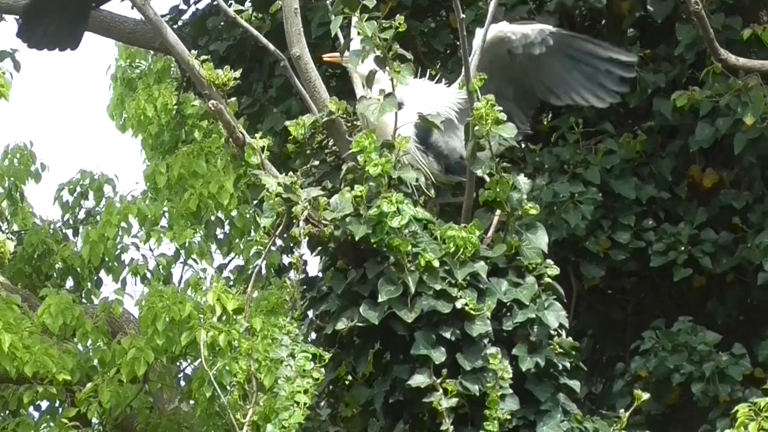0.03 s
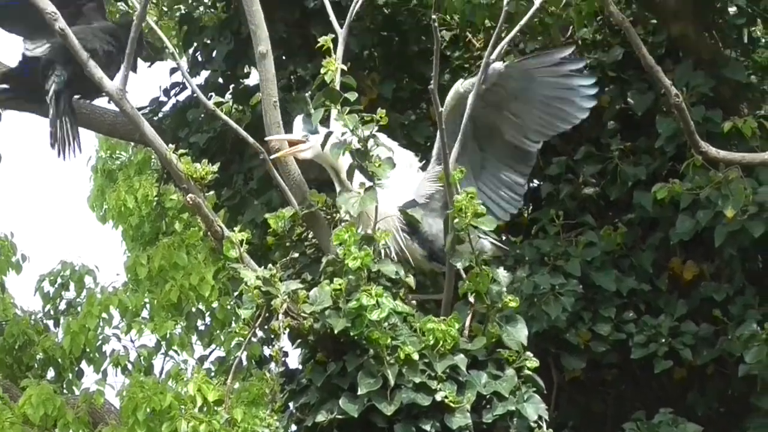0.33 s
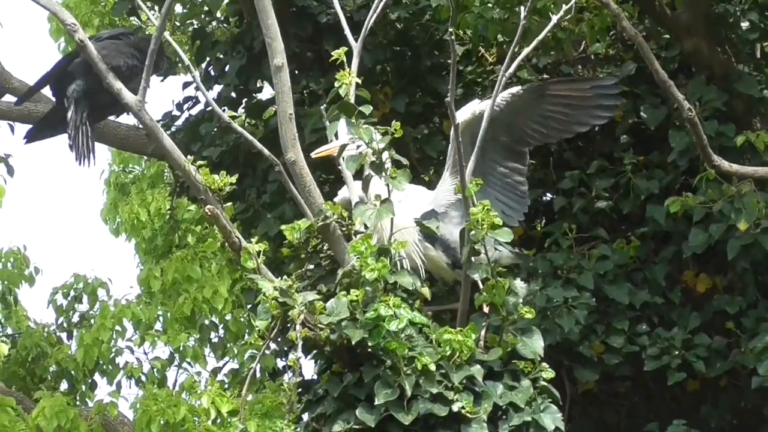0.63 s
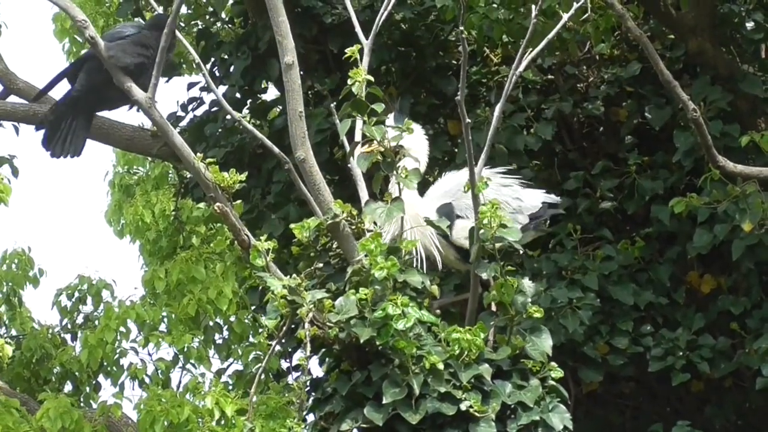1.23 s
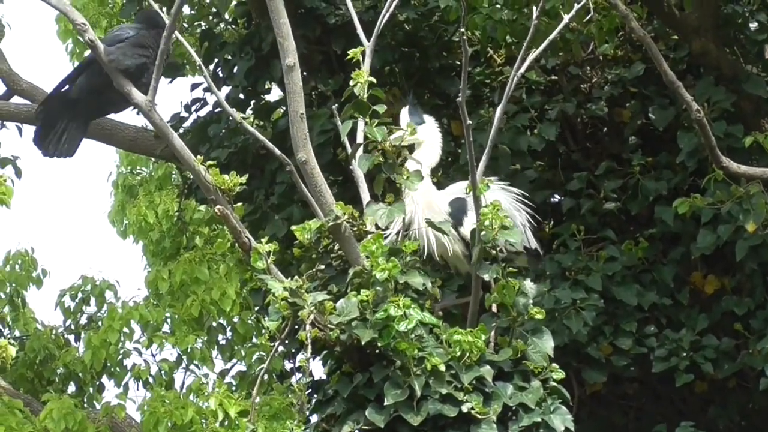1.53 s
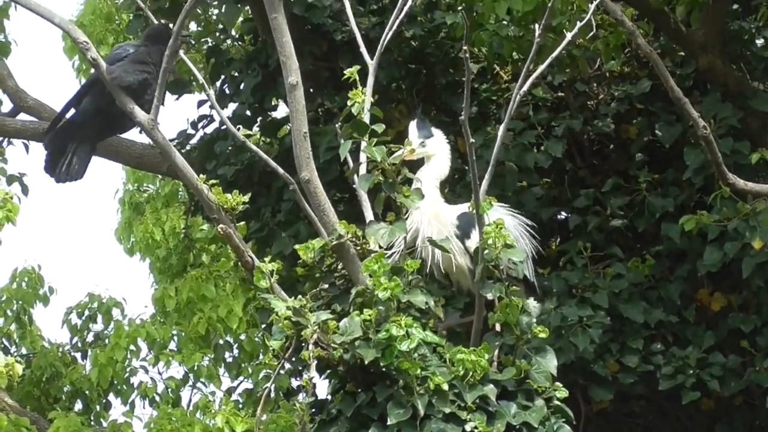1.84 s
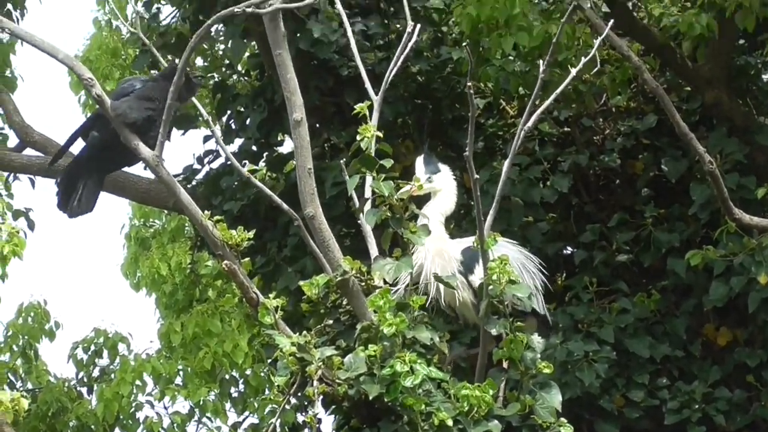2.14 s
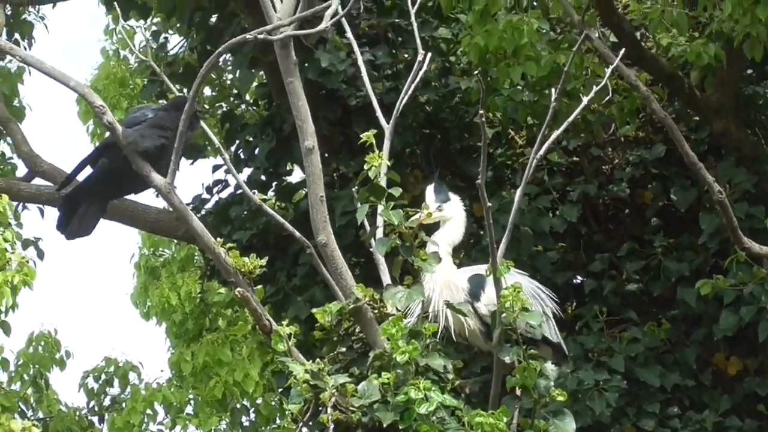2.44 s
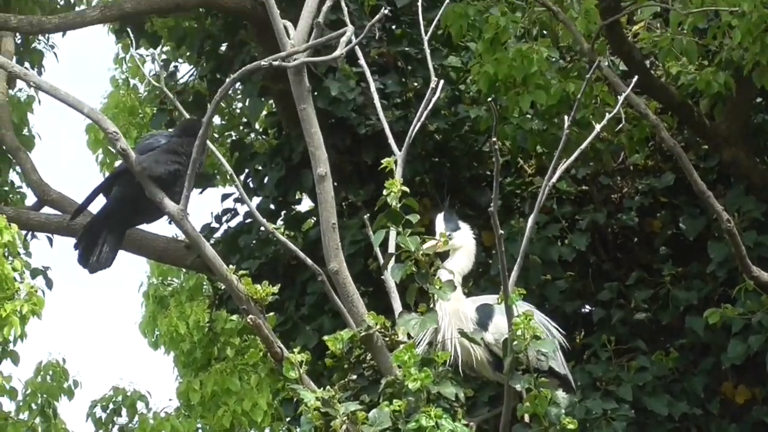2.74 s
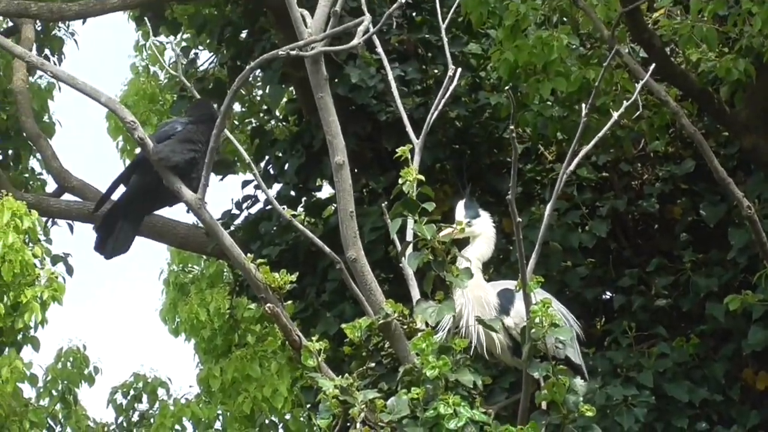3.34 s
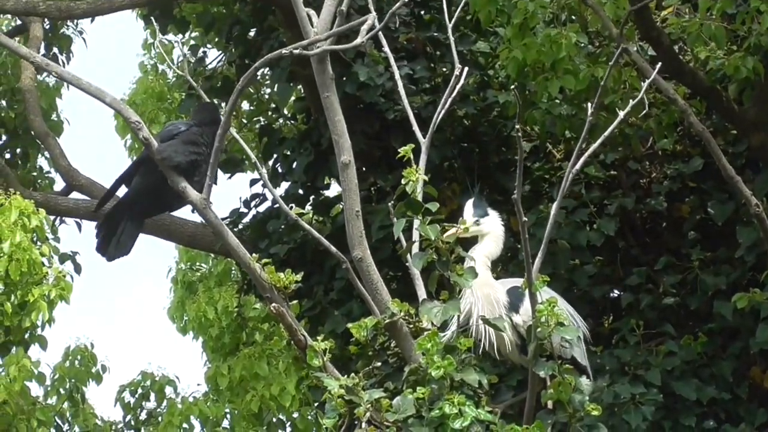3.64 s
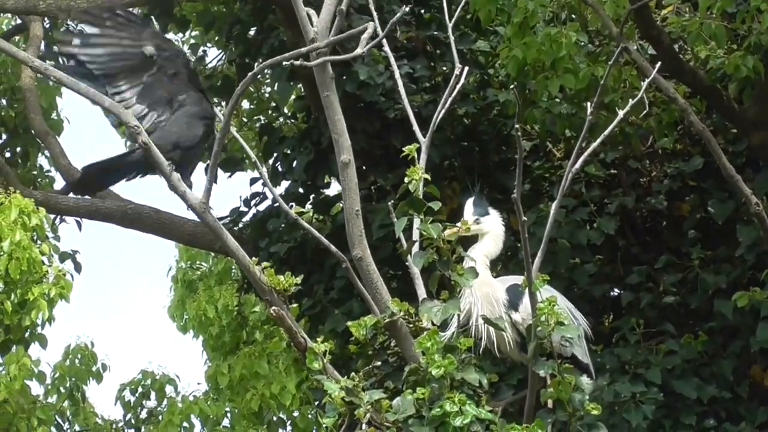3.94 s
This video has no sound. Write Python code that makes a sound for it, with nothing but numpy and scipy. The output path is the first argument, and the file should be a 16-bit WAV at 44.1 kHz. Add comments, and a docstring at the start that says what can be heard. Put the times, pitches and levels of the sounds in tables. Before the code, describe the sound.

A large bird croaks harshly again and again in the trees, a helicopter throbbing far off.

```python
"""A row of hoarse croaks, one sharp squawk and a grunt ring among the trees: a heron fends off a crow
at its treetop nest. The croaks and the grunt are a loose rattle that makes the bird's throat ring.
Wings brush the leaves, a twig cracks, a small bird whistles far off and something chirps faintly.
Under it all throb the blades of a distant rotor, probably a helicopter, slowly coming nearer."""
import sys
import numpy as np
from scipy import signal
from scipy.fft import rfft, irfft
from scipy.io import wavfile
from scipy.ndimage import uniform_filter1d

SR = 44100
rng = np.random.default_rng(int(sys.argv[2]) if len(sys.argv) > 2 else 0)


def master(y):
    """Save y as 16-bit WAV."""
    cut = np.clip(np.atleast_2d(y).T, -1, 1)
    pcm = np.round(cut * 32767)  # scale
    wavfile.write(sys.argv[1], SR, pcm.astype(np.int16))


N = 176400
T = np.arange(N) / SR


def from_db(db):
    """Turn decibels into a number to multiply by."""
    return 10 ** (np.asarray(db) / 20)


def unit_power(x):
    """Scale a sound so that its average power is 1."""
    return x / np.sqrt(np.mean(x ** 2) + 1e-20)


def steady(x, window_s):
    """Even out the loudness over a short window."""
    return x / np.sqrt(np.abs(uniform_filter1d(x * x, int(window_s * SR))) + 1e-6)


def over_time(rows):
    """Join a table's points with straight lines: one curve for each column after the time."""
    times, *columns = np.transpose(rows)
    return [np.interp(T, times, column) for column in columns]


def at_hz(points, hz):
    """Look up a frequency in a table, with octaves evenly spaced."""
    freqs, values = np.transpose(points)
    return np.interp(np.log(np.maximum(hz, 1)), np.log(freqs), values)


def drift(hz):
    """A smooth random wobble of about +-1; more hz makes it quicker."""
    r = np.exp(-200 * np.pi * hz / SR)
    slow = signal.lfilter([1], [1, -2 * r, r * r], rng.standard_normal(N // 100 + 1002))[1000:]
    return np.interp(np.arange(N) / 100, np.arange(len(slow)), unit_power(slow))


def colour(x, spectrum):
    """Give a sound the bass-to-treble balance in a table, at power 1."""
    cepstrum = irfft(at_hz(spectrum, np.fft.rfftfreq(N, 1 / SR)) * np.log(10) / 20)
    response = np.exp(rfft(2 * cepstrum * (np.arange(N) < N // 2)))  # rings after a click, not before
    return unit_power(irfft(rfft(x) * response))


def resonate(x, hz, width_hz):
    """Make a sound ring around one frequency, at power 1."""
    r = np.exp(-np.pi * width_hz / SR)
    section = [1 - r, 0, r - 1, 1, -2 * r * np.cos(2 * np.pi * hz / SR), r * r]
    return unit_power(signal.sosfilt([section, section], x))


def envelope(start, length, attack, release):
    """Rise, hold, then die away; all times in seconds."""
    return np.clip((T - start) / attack, 0, 1) * np.exp(-np.clip((T - start - length) / release, 0, 20))


def pan(x, db):
    """Make the left side louder than the right by db."""
    return x * from_db([[db / 2], [-db / 2]])


def rattle(hz, jitter, decay_s, uneven_db, snap):
    """Uneven slaps, as of a loose skin: each is a click and a dying puff of air."""
    draws = rng.standard_normal((int(2 * hz * N / SR), 2))
    at = (np.cumsum(np.exp(jitter * draws[:, 0])) * SR / hz).astype(int)
    clicks = np.zeros(N)
    clicks[at[at < N]] = from_db(uneven_db * np.clip(draws[at < N, 1], -2, 2))
    puffs = signal.lfilter([1], [1, -np.exp(-1 / (decay_s * SR))], clicks) * rng.standard_normal(N)
    return unit_power(unit_power(puffs) + snap * unit_power(clicks))


# how alike the two ears hear the background: (frequency [Hz], likeness [0-1])
EAR_LIKENESS = [(30, 0.9), (60, 0.98), (250, 0.94), (600, 0.62), (1500, 0.48), (5000, 0.16), (13000, 0)]
def wide_noise(spectrum):
    """Stereo noise, alike on both sides in the bass and different in the treble."""
    alike = np.clip(at_hz(EAR_LIKENESS, np.fft.rfftfreq(N, 1 / SR)), 0, .999)
    mid, side = rfft(rng.standard_normal((2, N)))
    return colour(irfft(np.sqrt(1 + alike) * mid + np.sqrt(1 - alike) * side * [[1], [-1]]), spectrum)


# tone of the still air: (frequency [Hz], relative level [dB])
AIR_COLOUR = [(25, 19), (60, 27), (300, 21.5), (1000, 16), (2200, 0), (4200, 8.5), (6200, -3.5), (9500, 1),
              (12000, -1), (14000, -25.5), (15500, -66)]
def air():
    """A soft, steady outdoor hush."""
    return from_db(-50.5) * wide_noise(AIR_COLOUR)


# tone of the rushing air: (frequency [Hz], relative level [dB])
WASH_COLOUR = [(40, -27), (110, -9), (170, -1.5), (330, 1.5), (480, -8), (700, -11), (1100, -16.5),
               (1500, -28), (2200, -36.5), (5000, -49.5)]
# its slow rise: (time [s], level [dB])
WASH_RISE = [(0, -35.5), (1.5, -33), (2.3, -32), (3.2, -31), (4, -31)]
def rotor_wash(phase):
    """Air pushed by the blades rushes, pulsing very slightly with each one."""
    level_db = over_time(WASH_RISE)[0] + 0.14 * np.cos(phase) + 0.35 * drift(2.7)
    return wide_noise(WASH_COLOUR) * from_db(level_db)


# loudness of the hum: (time [s], level [dB])
HUM_LEVEL = [(0, -44), (.55, -41), (1.55, -39), (1.75, -54), (2.05, -47), (2.55, -44), (2.9, -40),
             (3.4, -44), (3.6, -50.5), (4, -49)]
def rotor_hum(phase):
    """A low, wavering hum at twice the rate of the blades."""
    tone = np.sqrt(2) * np.sin(2 * phase + 0.15 * drift(1.8))
    return tone * from_db(over_time(HUM_LEVEL)[0] + 2.2 * drift(2.3))


# the tones that make up a slap: (multiple of the blade rate, relative level [dB])
SLAP_TONES = [(3, -22), (4, -6), (5, 1), (6, -1.5), (7, -2.5), (8, -4), (9, -4), (10, -7), (11, -8),
              (12, -20), (13, -41), (14, -29), (15, -16.5), (16, -25.5), (17, -20), (18, -21.5), (19, -42)]
# brightness of the slaps, above 0 favouring high tones: (time [s], tilt [dB per octave])
SLAP_TILT = [(0, -4.5), (1, 2), (2, 1), (2.4, -4.5), (3, 2.5), (4, -2.5)]
# slaps that arrive directly: (time [s], level [dB])
SLAP_LEVEL = [(0, -32), (.45, -46), (.8, -30), (1.1, -35.5), (1.22, -38.5), (1.5, -30.5), (1.85, -39),
              (2.08, -39), (2.28, -25.5), (2.46, -35.5), (2.62, -30.5), (2.76, -43), (2.94, -36),
              (3.13, -27), (3.3, -37), (3.5, -28), (3.75, -34.5), (3.93, -23.5), (4, -29)]
# slaps scattered by the surroundings: (time [s], level [dB])
ECHO_LEVEL = [(0, -33.5), (.7, -35.5), (1.5, -30.5), (2.05, -34), (2.6, -30.5), (3.1, -32), (4, -26.5)]
def blade_slaps(phase):
    """The blades slap the air in a throb that swells and fades, blurred by wandering echoes."""
    tilt, = over_time(SLAP_TILT)
    wander_hz = 1.5
    slaps, echoes, side = 0, 0, 0
    for k, db in SLAP_TONES:
        lag = 0.064 * (round(k) - 7) ** 2  # draws each slap out
        tone = from_db(db + tilt * np.log2(k / 7)) * np.exp(1j * (round(k) * phase - lag))
        slaps = slaps + tone.real * (1 + .25 * drift(wander_hz))
        echoes = echoes + tone.real * drift(wander_hz) + tone.imag * drift(wander_hz)
        side = side + tone.imag * drift(wander_hz)
    throb = unit_power(slaps) * from_db(over_time(SLAP_LEVEL)[0])
    blur = steady(echoes, window_s=0.35) + from_db(-17.5) * unit_power(side) * [[1], [-1]]
    return throb + blur * from_db(over_time(ECHO_LEVEL)[0])


# how often a blade passes: (time [s], rate [Hz])
BLADE_PASSES = [(0, 37.25), (1.7, 37.25), (1.9, 36.8), (2.4, 36.8), (2.75, 36.45), (3.15, 36.7), (4, 36.7)]
def rotor():
    """The distant turning blades set one beat for the slaps, the hum and the wash."""
    rate, = over_time(BLADE_PASSES)
    delay_s = .022
    phase = 2 * np.pi * (np.cumsum(rate) / SR - delay_s * rate)
    return pan(blade_slaps(phase) + rotor_hum(phase), db=-2.2) + pan(rotor_wash(phase), db=2.0)


# how long the trees ring: (frequency [Hz], time to fade by 60 dB [s])
ECHO_FADE = [(500, 0.6), (1300, 1.0), (4000, 1.2), (8000, .55), (15000, .5)]
# how strongly they ring: (frequency [Hz], level [dB])
ECHO_COLOUR = [(500, 4), (1300, -4.5), (4000, -2.5), (8000, -6.5), (15000, -7)]
# how wide the ring sounds: (frequency [Hz], width [side over middle])
ECHO_WIDTH = [(1300, 0.49), (4000, 0.56), (10000, 1.4)]
def tree_echo(x):
    """Trunks and leaves scatter a sound into a soft tail that dies soonest in the high treble."""
    edges = np.geomspace(300, 17000, num=10)
    tail = 0
    for low, high in zip(edges, edges[1:]):
        band = signal.butter(2, [low, high], "band", fs=SR, output="sos")
        mid, side = signal.sosfilt(band, rng.standard_normal((2, SR)))
        hz = np.sqrt(low * high)
        decay = unit_power(from_db(-60 * T[:SR] / at_hz(ECHO_FADE, hz))) / np.sqrt(SR)
        stereo = mid + at_hz(ECHO_WIDTH, hz) * side * [[1], [-1]]
        tail = tail + from_db(at_hz(ECHO_COLOUR, hz)) * decay * stereo
    return signal.fftconvolve(x[None], tail, axes=1)[:, :N]


# faint chirping that grows near the end: (time [s], level [dB])
CHIRP_LEVEL = [(3.2, -95), (3.29, -80), (3.45, -85), (3.52, -76), (4, -72)]
def chirping():
    """A thin, fitful, very high trill, perhaps an insect."""
    pulse_hz = 22
    pulses = from_db(6 * np.sin(2 * np.pi * pulse_hz * T + 2 * drift(6)) + 3.5 * drift(12))
    whine = resonate(rng.standard_normal(N), hz=13250, width_hz=300)
    return from_db(over_time(CHIRP_LEVEL)[0]) * unit_power(whine * pulses)


# the small bird's notes: (start [s], length [s], pitch [Hz], level [dB])
SONG_NOTES = [(0.636, .2, 3980, -52.5), (.86, 0.11, 5280, -60), (1.18, .13, 5290, -59.5),
              (1.45, 0.14, 5850, -60), (1.846, 0.086, 5600, -55.5), (2.12, 0.1, 5200, -62)]
def songbird():
    """A small bird sings thin, wavering whistles."""
    waver = 1 + .03 * drift(130.7)
    song = 0
    for start, length, hz, db in SONG_NOTES:
        whistle = np.sin(2 * np.pi * np.cumsum(hz * waver) / SR)
        song = song + from_db(db) * envelope(start, length, attack=0.0049, release=0.036) * whistle
    return song


# wings touching the leaves: (start [s], length [s], level [dB])
WING_STROKES = [(0.58, 0.027, -50.5), (0.973, 0.074, -48.5), (1.813, 0.071, -47), (2.082, 0.096, -53),
                (2.62, 0.028, -56), (2.762, 0.021, -52), (2.893, 0.12, -54), (3.547, 0.018, -50.5),
                (3.672, 0.013, -51.5), (3.804, 0.016, -51)]
# tone of the rustle: (frequency [Hz], relative level [dB])
LEAF_COLOUR = [(500, -5), (1050, 22.5), (1500, 0), (2100, 9.5), (3000, 4), (4200, 6), (6200, -0.5),
               (9000, 2), (12000, -16), (15500, -43)]
def wing_brushes():
    """Feathers drag over leaves in short, grainy swishes."""
    grains = rattle(hz=900, jitter=.6, decay_s=.002, uneven_db=2.5, snap=.25)
    rustle = steady(colour(grains, LEAF_COLOUR), window_s=.02)
    return rustle * sum(from_db(db) * envelope(start, length, attack=0.011, release=0.014)
                        for start, length, db in WING_STROKES)


# the wood giving way: (time [s], level [dB])
TWIG_SNAPS = [(2.855, -48), (3.602, -35.5), (3.611, -47)]
# tone of a snap: (frequency [Hz], relative level [dB])
TWIG_COLOUR = [(600, 7), (1500, 10.5), (2500, -1), (4000, -3), (6200, -8.5), (9000, -1), (12000, -10),
               (15500, -22)]
def twig_cracks():
    """A twig cracks in sudden bursts of noise that die quickly."""
    bursts = sum(from_db(db) * envelope(start, 0.0025, attack=0.0015, release=0.012)
                 for start, db in TWIG_SNAPS)
    return bursts * colour(rng.standard_normal(N), TWIG_COLOUR)


# where the throat rings in the grunt: (frequency [Hz], width [Hz], relative level [dB])
GRUNT_RINGS = [(1070, 120, 1), (2065, 290, -10), (2250, 390, -11), (4040, 1900, -6.5), (7400, 2900, -9),
               (9400, 5300, -17)]
def grunt():
    """One short nasal grunt: a quick rattle through a narrowed throat."""
    source = rattle(hz=165, jitter=.07, decay_s=.0025, uneven_db=1.5, snap=.8)
    voice = sum(from_db(db) * resonate(source, hz, width) for hz, width, db in GRUNT_RINGS)
    effort = from_db(-41) * envelope(start=1.099, length=0.077, attack=.025, release=.015)
    return effort * steady(voice, window_s=.03)


# clicks that break out of the squawk: (time [s], level [dB])
SQUAWK_CLICKS = [(.3197, -18.5), (.3362, -18.5), (.3527, -14), (.3573, -15), (.3648, -18.5)]
def crackle():
    """Tiny bursts of bright noise, heard as sharp clicks."""
    bursts = sum(from_db(db) * envelope(start, .0002, attack=.0001, release=.0005)
                 for start, db in SQUAWK_CLICKS)
    treble = signal.butter(3, [3000, 10000], "band", fs=SR, output="sos")
    return signal.sosfilt(treble, bursts * rng.choice([-1, 1], N))


# course of the squawk: (time [s], pitch [Hz], tone level [dB], rasp level [dB])
SQUAWK_PATH = [(.289, 669.8, -30, -38), (.299, 665, -34, -27), (.314, 650, -32, -26),
               (.33, 652.7, -21.5, -31), (.341, 652.4, -26, -30.5), (.347, 663, -30, -23),
               (.357, 688, -21, -32.5), (.367, 668, -53, -35), (.376, 640, -57, -52)]
# the tones stacked in it: (multiple of the pitch, relative level [dB])
SQUAWK_TONES = [(1, -12.5), (2, 3.5), (3, -14.5), (4, -16.5), (5, -17), (6, -28)]
# tone of its rasp and buzz: (frequency [Hz], relative level [dB])
RASP_COLOUR = [(400, -22), (850, -5), (1130, 5), (1320, 11.5), (1540, 14), (1760, 1), (4000, -2),
               (5200, -6.5), (6300, -21), (8000, -8), (9800, -10), (12000, -35), (15500, -38)]
def squawk():
    """A brief, harsh cry. Every second vibration is stronger, so it buzzes and rasps an octave lower."""
    hz, tone_db, rasp_db = over_time(SQUAWK_PATH)
    phase = 2 * np.pi * np.cumsum(hz * (1 + .005 * drift(120))) / SR
    tone = np.sqrt(2) * sum(from_db(db) * np.sin(round(k) * phase) for k, db in SQUAWK_TONES)
    beat = phase / 2 + .05 * drift(200)  # half the pitch, a little unsteady
    buzz = colour(sum(np.cos(k * beat + rng.uniform(0, np.pi)) for k in range(5, 18)), RASP_COLOUR)
    pulsing_noise = rng.standard_normal(N) * (1 + .7 * np.cos(beat))
    rasp = steady(colour(pulsing_noise, RASP_COLOUR), window_s=0.0091)
    voice = from_db(tone_db) * tone + from_db(rasp_db) * (rasp + from_db(-6) * buzz)
    sounding = (T > SQUAWK_PATH[0][0]) * (T < SQUAWK_PATH[-1][0])
    return voice * sounding + crackle()


# the heron's croaks: (start [s], length [s], rise time [s], level [dB], fade over the call [dB],
# bill boost [dB], hiss level [dB], throat ring [Hz])
CROAK_CALLS = [(0.056, 0.34, .02, -33.5, -0.5, 0, -51.5, 1300), (0.756, .18, 0.016, -37, 2, 2.5, -49, 1300),
               (1.382, 0.19, 0.031, -35.5, 6.5, 2, -54, 1272), (2.261, .18, 0.025, -35, 2, 0, -54, 1273),
               (3.035, 0.16, .008, -35, 5, 3.5, -52, 1310),
               (3.92, 0.16, 0.029, -40.5, -3, 4.5, -56.5, 1250)]
# tone of the throat: (multiple of the throat ring, relative level [dB])
THROAT_COLOUR = [(.3, -43.5), (.66, -14), (.82, -3), (1.0, 2.5), (1.17, -5), (1.28, -16), (1.39, -25),
                 (1.9, -54.5)]
# higher rings of the throat and bill: (frequency [Hz], width [Hz], relative level [dB])
BILL_RINGS = [(2000, 510, -22.5), (2880, 143, -26.5), (3750, 1100, -28), (4680, 240, -31)]
# tone of the air hissing through the open bill: (frequency [Hz], relative level [dB])
HISS_COLOUR = [(2000, -9.5), (4000, 8), (6200, -2.5), (8000, 4.5), (10000, 1.5), (12000, -5), (15500, -20)]
# moments when the voice catches and surges: (time [s], boost [dB])
VOICE_SURGES = [(.775, 5), (.808, 6), (.84, 6), (.913, 5), (1.425, 3), (1.455, 7), (2.313, 6), (2.358, 7),
                (3.081, 6.5), (3.15, 6), (3.187, 4)]
def croaks():
    """A loose rattle rings the throat and bill, arching in pitch and surging, while air hisses out."""
    rattle_hz, jitter, pitch_arch, surge_s = 134, .04, .09, .007
    source = rattle(rattle_hz, jitter, decay_s=.003, uneven_db=2.5, snap=1.4)
    bill = sum(from_db(db) * resonate(source, hz, width) for hz, width, db in BILL_RINGS)
    hiss = colour(rattle(rattle_hz, jitter, decay_s=0.011, uneven_db=2.5, snap=0.059), HISS_COLOUR)
    surge = from_db(sum(db * np.exp(-((T - time) / surge_s) ** 2) for time, db in VOICE_SURGES))
    calls = 0
    for start, length, attack, db, fade_db, bill_db, hiss_db, hz in CROAK_CALLS:
        progress = np.clip((T - start) / length, 0, 1)
        spectrum = [(hz * ratio, level) for ratio, level in THROAT_COLOUR]
        throat = steady(colour(source, spectrum), window_s=0.015)
        # running the throat sound faster, then slower, lifts its pitch early and lets it sink
        bent_time = np.cumsum(1 + pitch_arch * (np.sin(np.pi * np.sqrt(progress)) - .5)) / SR
        voice = surge * np.interp(bent_time, T, throat) + from_db(bill_db) * bill
        effort = envelope(start, length, attack, release=0.045) * from_db(db - fade_db * progress)
        breath = from_db(hiss_db) * envelope(start, length, attack=0.036, release=0.031)
        calls = calls + effort * voice + breath * hiss
    return calls


def scene():
    """The birds among the trees, the songbird heard mostly as echo, over the rotor and the still air."""
    nest = croaks() + grunt() + wing_brushes() + twig_cracks()
    cry, song = squawk(), songbird()
    direct = nest + cry + from_db(-18) * song
    echo = tree_echo(nest + from_db(-4.5) * cry + song)
    return pan(direct + echo, db=0.4) + pan(chirping(), db=-17) + rotor() + pan(air(), db=-1.5)


def record(dry):
    """The sound opens after a moment of silence, and the very highest treble is cut."""
    silence_s, fade_in_s, cutoff_hz = 0.0799, 0.0092, 16000
    opened = dry * np.clip((T - silence_s) / fade_in_s, 0, 1)
    return signal.sosfilt(signal.cheby2(16, 70, cutoff_hz, fs=SR, output="sos"), opened)


dry = scene()
out = record(dry)
master(out)
```